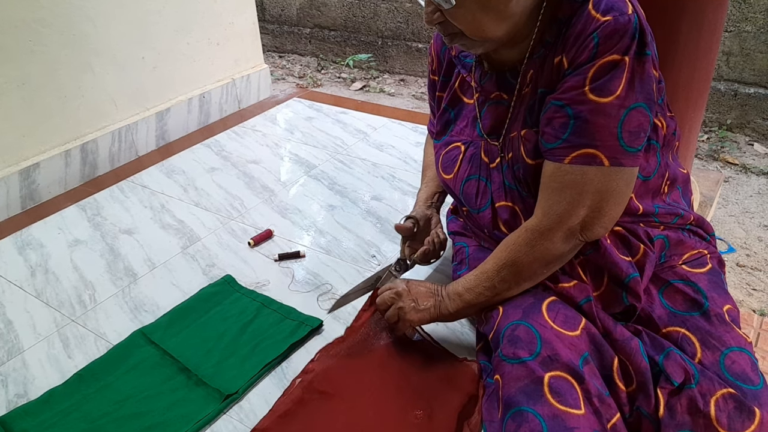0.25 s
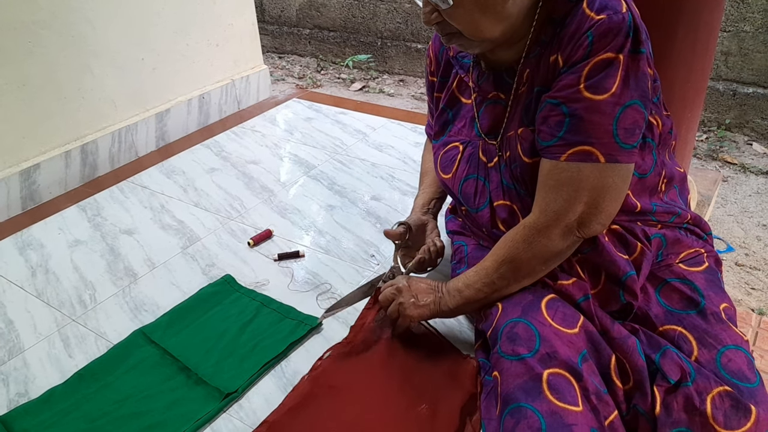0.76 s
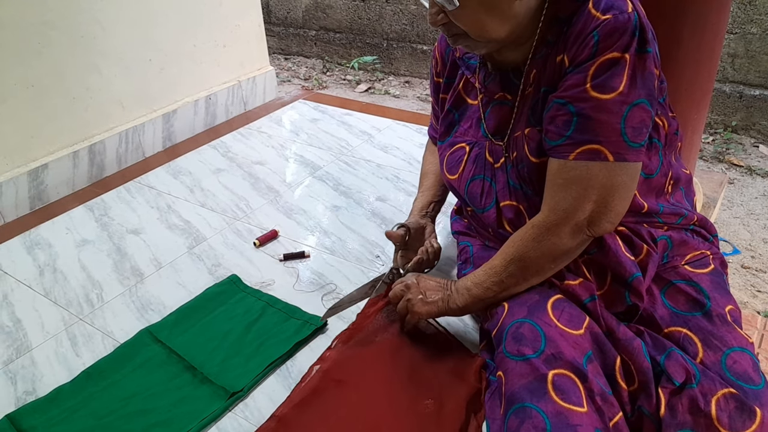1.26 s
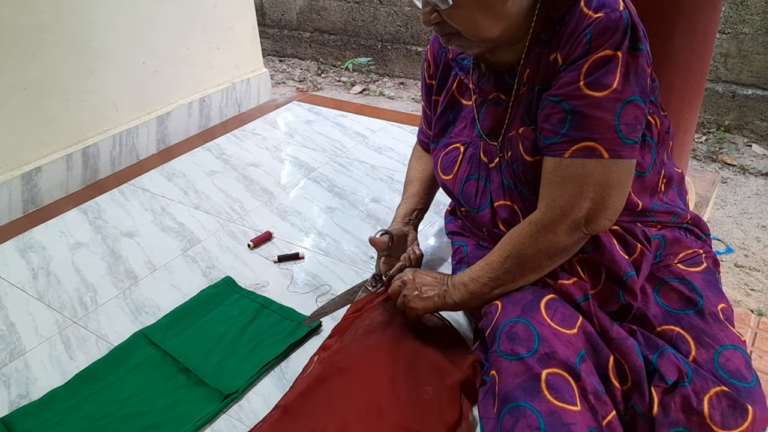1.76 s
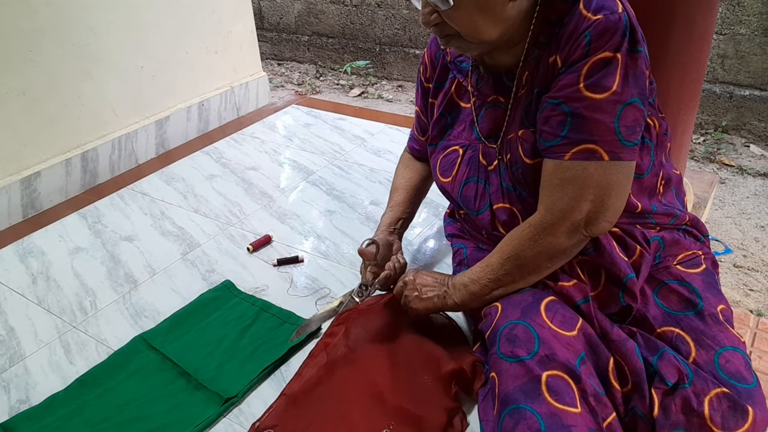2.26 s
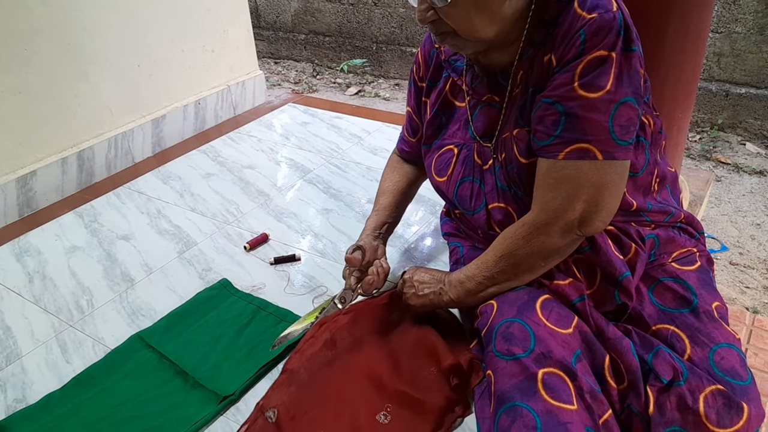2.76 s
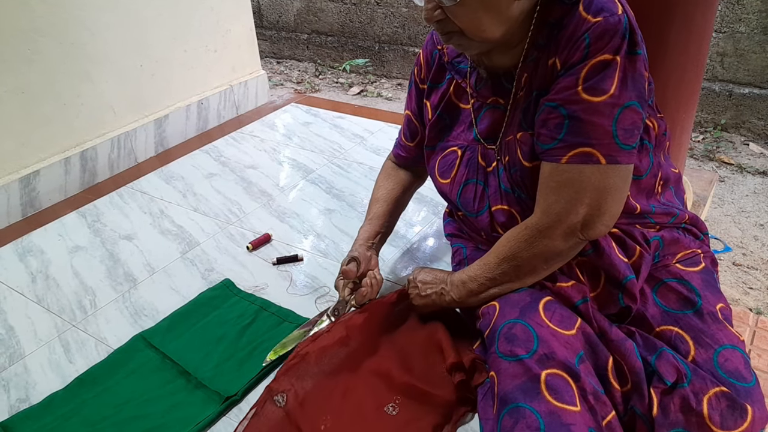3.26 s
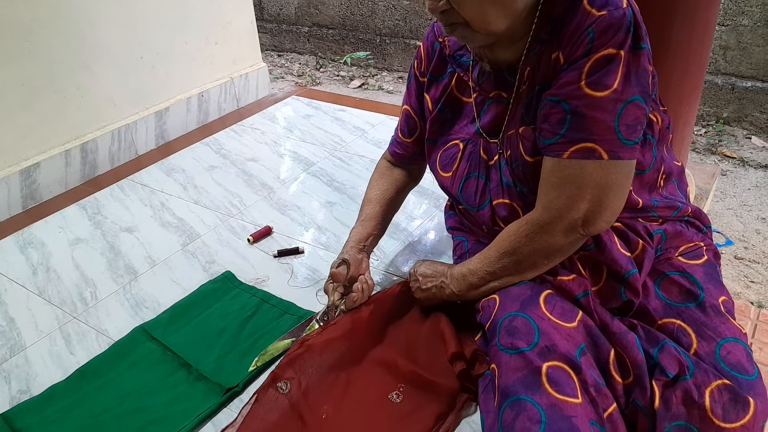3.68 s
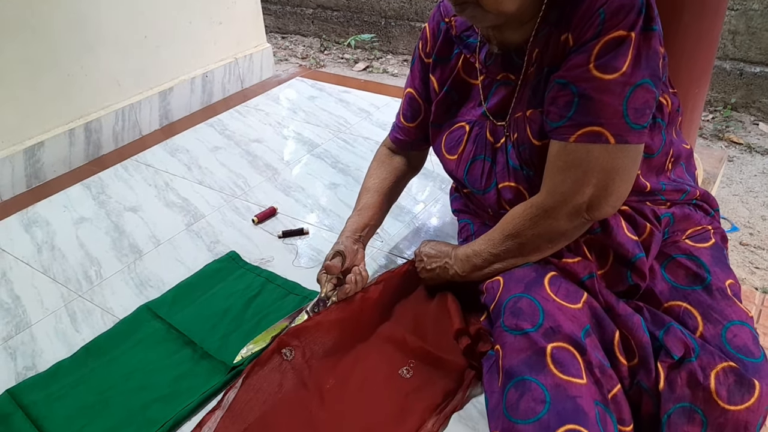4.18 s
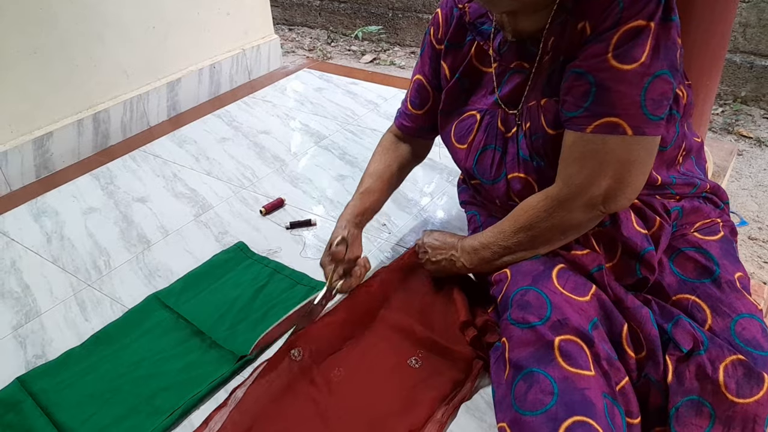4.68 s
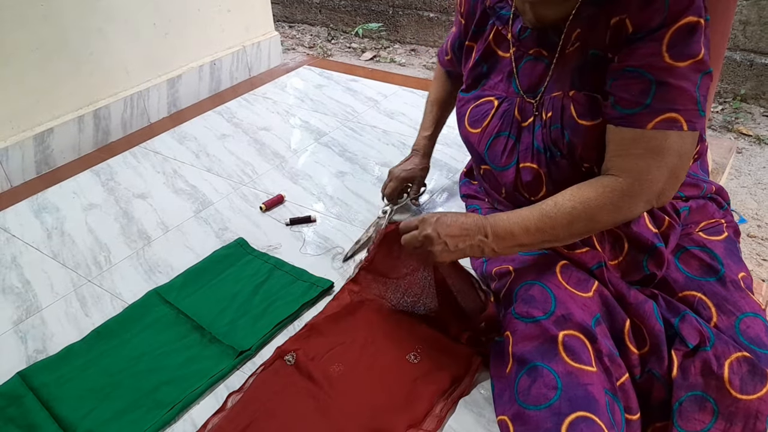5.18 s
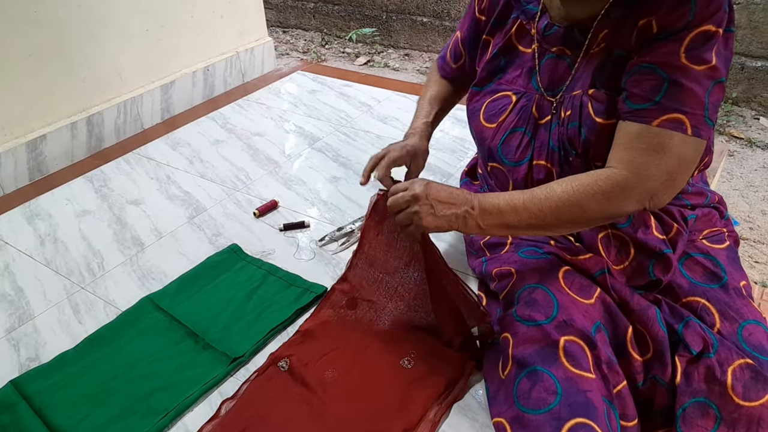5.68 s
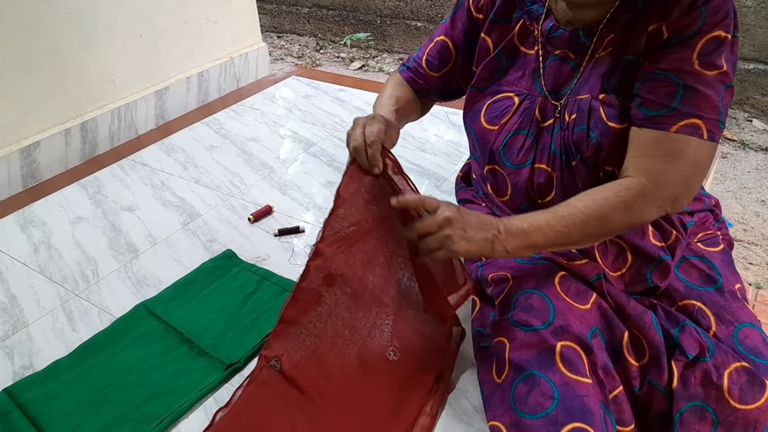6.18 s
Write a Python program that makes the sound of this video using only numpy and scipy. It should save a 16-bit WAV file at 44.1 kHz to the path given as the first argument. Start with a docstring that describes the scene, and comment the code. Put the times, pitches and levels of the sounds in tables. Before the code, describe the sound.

On an open tiled porch, the tail of a rooster's crow sags into a rasp within the first second. Close scissors then snip slowly through thin cloth, crunchy at first, thinner and quieter later. Near the end the steel scissors clatter on the stone floor, bounce and slide, and cloth rustles faintly. Far rooster calls and tiny chirps sit behind. Close stereo pickup, scissors slightly right.

```python
"""A yard beside an open tiled porch, heard by two spaced microphones with the scissors to the right.
Close by, steel scissors snip through thin cloth (grains of noise and ringing blades), then are dropped
on the stone floor, bounce and slide (contact noise ringing the steel's modes).
A rooster ends its crow (trembling partials and rasp); another rooster and small birds call far off
(narrow bands of noise). Low outdoor rumble and a faint hiss (shaped noise) lie under everything."""
import sys
import numpy as np
from scipy import signal
from scipy.fft import rfft, irfft
from scipy.io import wavfile

SR = 44100
rng = np.random.default_rng(int(sys.argv[2]) if len(sys.argv) > 2 else 0)


def gain_from_decibels(decibels):
    """Convert decibel values to linear amplitude factors."""
    exponent = np.asarray(decibels, float) / 20
    return 10 ** exponent


def wav_record(signal):
    """Record a signal, one row per channel, as 16-bit PCM in the file named by sys.argv[1]."""
    frames = np.transpose(np.atleast_2d(signal))
    bounded = np.clip(frames, -1, 1)
    # unit amplitude maps onto the largest positive 16-bit level
    quanta = np.round(bounded * 32767).astype(np.int16)
    wavfile.write(sys.argv[1], SR, quanta)


N = 284004   # length [samples]


def rms_one(x):
    """Scale to rms 1."""
    return x / np.sqrt(np.mean(x ** 2) + 1e-20)


def in_time(rows):
    """Columns of a curve, sample by sample, and a gate that fades in 8 ms outside its span."""
    s, *columns = np.transpose(rows)
    t = np.arange(N) / SR
    gate = np.interp(t, [s[0] - .008, s[0], s[-1], s[-1] + .008], [0, 1, 1, 0])
    return [np.interp(t, s, c) for c in columns] + [gate]


def drift(rate_hz):
    """Slow chance of spread 1: white noise through two equal one-pole lowpasses."""
    r = np.exp(-2 * np.pi * rate_hz / SR)
    settled = signal.lfilter([1], [1, -2 * r, r * r], rng.standard_normal(N + SR))[SR:]
    return rms_one(settled)


def colour(x, spectrum):
    """Shape by a spectrum in dB per Hz with the causal (minimum-phase) filter of that shape."""
    hz, level_db = np.transpose(spectrum)
    grid = np.maximum(np.arange(2049) * SR / 4096, 1)
    cepstrum = irfft(np.interp(np.log(grid), np.log(hz), level_db) * np.log(10) / 20)
    cepstrum[1:2048] *= 2   # folding the cepstrum forward makes the filter causal
    kernel = irfft(np.exp(rfft(cepstrum[:2049], 4096)))
    kernel = kernel.reshape((1,) * (x.ndim - 1) + (-1,))
    kernel = kernel / np.sqrt(np.sum(kernel ** 2))   # white noise keeps its level
    return signal.fftconvolve(x, kernel, axes=-1)[..., :N]


def resonance(x, hz, width_hz):
    """Two-pole resonance with gain 1 on top."""
    r = np.exp(-np.pi * width_hz / SR)
    poles = [1, -2 * r * np.cos(2 * np.pi * hz / SR), r * r]
    return signal.lfilter([(1 - r * r) / 2, 0, (r * r - 1) / 2], poles, x + 1e-18)


def narrow_noise(hz, width_hz):
    """Band of noise whose centre follows hz, from two drifts on carriers a quarter turn apart; rms 1."""
    turn = 2 * np.pi * np.cumsum(hz) / SR
    return drift(width_hz) * np.cos(turn) + drift(width_hz) * np.sin(turn)


def grains(per_s, spread_db):
    """Dense random clicks of uneven size; rms 1."""
    sizes = gain_from_decibels(spread_db * np.minimum(rng.exponential(1, N), 5)) * rng.choice([-1, 1], N)
    return rms_one(sizes * (rng.random(N) < per_s / SR))


def bursts(rows, rise_s, lengths_s, extra_db):
    """Envelope of sudden bursts that die away exponentially."""
    out, t = np.zeros(N), np.arange(SR // 5) / SR
    for row, length_s, db in zip(rows, lengths_s, extra_db + np.zeros(len(rows))):
        at = round(row[0] * SR)
        shape = (1 - np.exp(-t / rise_s)) * np.exp(-t / length_s)
        out[at:at + len(t)] += gain_from_decibels(row[1] + db) * shape
    return out


def swell(start, end):
    """Half a sine from start to end [s]."""
    return np.sin(np.pi * np.clip((np.arange(N) / SR - start) / (end - start), 0, 1))


LEFT_LAG_S = .00014   # the common part reaches the left microphone this much later


def both_sides(make, shared):
    """A spread-out source: each side hears a common part, right side first, and a part of its own."""
    common = make()
    common = np.array([np.roll(common, round(LEFT_LAG_S * SR)), common])
    own = np.array([make(), make()])
    return np.sqrt(shared) * common + np.sqrt(1 - shared) * own


# the blades close through the cloth:
# (start [s], length [s], level at the start [dB], gain until the end [dB])
CLOSINGS = [(0.709, 0.059, -55.5, 5), (0.978, .13, -62, 6.5), (1.171, 0.29, -66, 10),
            (1.861, 0.11, -62, -0.5), (2.292, 0.099, -62.5, 6.5), (2.702, 0.2, -60, -9),
            (3.187, 0.19, -63.5, 0), (3.699, 0.11, -62.5, -4.5), (4.092, 0.097, -67.5, 6.5),
            (4.455, 0.12, -70.5, 1)]
# the blades open again and brush the cloth: (start [s], end [s], level at the crest [dB])
OPENINGS = [(1.628, 1.758, -68.5), (2.053, 2.18, -69.5), (2.503, 2.66, -68.5), (2.937, 3.088, -73),
            (3.417, 3.604, -75), (3.88, 4.055, -74.5), (4.322, 4.43, -76), (4.64, 4.84, -80.5)]
BITE_S, LET_GO_DB_PER_S = 0.016, 356   # rise and fall of a closing


def strokes():
    """Effort of the blades: closings bite at once, change in level and let go; openings swell softly."""
    t = np.arange(N) / SR
    out = sum(gain_from_decibels(db) * swell(start, end) for start, end, db in OPENINGS)
    for start, length, db, gain_db in CLOSINGS:
        level_db = db + gain_db * np.clip((t - start) / length, 0, 1)
        level_db -= LET_GO_DB_PER_S * np.clip(t - start - length, 0, 1)
        out = out + np.clip((t - start) / BITE_S, 0, 1) * gain_from_decibels(level_db)
    return out


# threads part in a jerk:
# (time [s], level before rise and decay [dB], blade ring relative to that [dB])
SLIPS = [(0.721, -53, -26), (1.18, -69, -10), (1.387, -57, -29), (1.443, -69, -11), (1.482, -44, -8),
         (1.672, -64, -8), (1.87, -61, -14), (1.911, -45.5, 6), (1.95, -40.5, -11), (2.277, -67, 7),
         (2.302, -55.5, 8), (2.336, -49, 4), (2.385, -51.5, 6), (2.752, -45, 1), (2.79, -56, 3),
         (2.858, -47.5, -6), (3.212, -51.5, -7), (3.262, -52, 1), (3.291, -50, -3.5), (3.356, -52, 1.5),
         (3.714, -54, -9), (3.755, -53.5, 8), (3.791, -58, 8), (4.098, -66, -2), (4.115, -58, 3),
         (4.183, -61, -4), (4.494, -62.5, 11), (4.518, -63.5, 11), (4.556, -58, 3)]
SLIP_RISE_S, SLIP_S = .008, 0.0074   # time constants of a jerk's rise and decay
# colour of parting threads: (frequency [Hz], level [dB per Hz])
CLOTH = [(800, -22), (2000, -6), (3000, -10), (3600, -6), (5500, -2.5), (9400, -3), (14000, -1.5),
         (16000, -6)]
# the fold of cloth thins as the cut goes on:
# (time [s], crunch relative to force [dB], low rustle relative to stroke [dB])
FOLD = [(.72, -4, -1), (1.0, -9, -18), (1.35, -8.5, -8), (2.3, -9.5, -15), (3.2, -25, -15),
        (4.6, -62, -17.5)]
# cloth shifts under the hands throughout and is lifted at the end: (time [s], level [dB])
RUSTLE = [(.1, -71), (.45, -72), (.62, -76), (.71, -61.5), (.85, -78.5), (2.0, -82.5), (3.6, -83.5),
          (5.15, -79.5), (5.6, -73), (5.75, -88), (5.86, -75.5), (6.074, -79), (6.1, -72), (6.44, -79.5)]
# resonances of the blades: (frequency [Hz], width [Hz], middle of the wavering level [dB])
BLADES = [(5700, 300, -9), (6700, 250, -8), (7750, 350, -6), (10900, 200, 0), (11900, 250, -6),
          (14300, 500, -1)]


def cutting():
    """Close at hand, threads part as dense grains; each jerk also sets the blades singing."""
    crunch_db, low_db, _ = in_time(FOLD)
    rustle_db, gate = in_time(RUSTLE)
    lengths_s, ring_db = np.full(len(SLIPS), SLIP_S), np.transpose(SLIPS)[2]
    stroke = strokes() * gain_from_decibels(2.0 * drift(30))
    force = stroke + bursts(SLIPS, SLIP_RISE_S, lengths_s, 0)
    parting = both_sides(lambda: grains(9000, 2.96), 0.21)
    threads = colour(parting, CLOTH) * (force + gate * gain_from_decibels(rustle_db))
    crunch = rms_one(resonance(resonance(parting, 3750, 2400), 4730, 2400)) * gain_from_decibels(crunch_db)
    low_rustle = rms_one(resonance(parting[1], 350, 1300)) * gain_from_decibels(low_db)
    rub = both_sides(lambda: rng.standard_normal(N), 0.033)
    rings = 0
    for hz, width_hz, level_db in BLADES:
        rings = rings + gain_from_decibels(level_db + 4.0 * drift(10)) * rms_one(resonance(rub, hz, width_hz))
    ring_force = bursts(SLIPS, SLIP_RISE_S, lengths_s, ring_db) + gain_from_decibels(-15.0) * force
    return threads + force * crunch + stroke * low_rustle + rings * ring_force


# scissors meet the floor: (time [s], level before rise, decay and trims [dB],
# rattle decay time [s], best excited pitch [Hz], bright crack relative to the level [dB])
DROPS = [(5.183, -17, 0.01, 6546, 4), (5.391, -30.5, 0.0098, 5000, -17), (5.487, -20.5, 0.011, 8866, -15),
         (5.653, -16.5, 0.012, 5512, -13)]
LANDING_S = .0025   # time constant with which a drop builds up
# scraping over stone: (time [s], level [dB], low grind relative to that [dB])
SLIDE = [(5.49, -41.5, -16.5), (5.52, -36.5, -13), (5.59, -36.5, -18.5), (5.62, -43, -16.5),
         (5.645, -63, 11.5)]
# contact colour of the floor: (frequency [Hz], level [dB per Hz])
STONE = [(180, -36.5), (300, -7), (455, -18.5), (930, -20), (2840, -6), (3290, 2.5), (5520, 1.5),
         (10600, -2.5), (14000, -4.5), (16000, -19)]
# modes of the loose scissors: (frequency [Hz], width, held to 45 or more [Hz], level [dB])
SCISSORS = [(1610, 28, -14), (1984, 60, -11), (2260, 26, -23), (3470, 40, -36), (4130, 27, -17),
            (4520, 43, -25), (5000, 27, -12.5), (5512, 47, -8), (6000, 60, -28), (6546, 50, -3.5),
            (8020, 120, -5.5), (8866, 150, -2.5), (10040, 110, -14), (11600, 130, -17), (12810, 130, -12.5),
            (13800, 130, -4), (15550, 140, -14)]


def scissors_on_floor():
    """Each drop is a short rattle of contacts, the slide a steady one; both ring the steel's modes."""
    slide_db, grind_db, gate = in_time(SLIDE)
    lengths_s, best_hz, crack_db = np.transpose(DROPS)[2:]
    sliding = gate * gain_from_decibels(slide_db + 1.8 * drift(45))
    touch = both_sides(lambda: grains(8000, 2.9), 0.18)
    out = colour(touch * (bursts(DROPS, LANDING_S, lengths_s, -7) + sliding), STONE)
    crack = touch * bursts(DROPS, LANDING_S, .5 * lengths_s, crack_db)
    out += signal.sosfilt(signal.butter(2, 8000, "high", fs=SR, output="sos"), crack)
    for hz, width_hz, level_db in SCISSORS:
        width_hz = max(width_hz, 45)
        # where the steel lands decides which modes ring most
        octaves_off = np.abs(np.log2(hz / best_hz))
        favoured_db = 5.0 - 11.0 * np.minimum(octaves_off / 0.13, 1)
        blows = bursts(DROPS, LANDING_S, lengths_s, favoured_db - 12) + gain_from_decibels(-16.5) * sliding
        even = np.sqrt(SR / (np.pi * width_hz))   # makes up for the power a narrow mode lets through
        out += gain_from_decibels(level_db) * even * resonance(touch * blows, hz, width_hz)
    grind = rms_one(resonance(rng.standard_normal(N), 534, 240))
    return out + gate * gain_from_decibels(slide_db + grind_db) * grind


TIRE_DB_PER_S, SLACKEN_DB_PER_S = 4, 218   # effort sinks from the start, then drops once let go


def held_note(start, held, end, hz, sag, linger_db):
    """Pitch, effort and gate of one note: pitch sags and effort sinks to a lingering level."""
    t = np.arange(N) / SR
    effort_db = -TIRE_DB_PER_S * np.clip(t - start, 0, 1) - SLACKEN_DB_PER_S * np.clip(t - held, 0, 1)
    effort_db = np.maximum(effort_db, linger_db)
    # no fade in the first 20 ms: the crow is already under way
    gate = np.clip(np.minimum(t - start + .01, end - t) / .02, 0, 1) ** (t > .02)
    return hz - sag * np.clip(t - start, 0, 1), effort_db, gate * (t > start - .01)


# held notes of the crow: (start [s], held until [s], end [s], pitch at the start [Hz],
# sag [Hz per s], effort at which it lingers [dB])
NOTES = [(0, 0.029, 0.34, 705, 1, -14), (0.032, 0.264, 0.48, 732.2, 23, -11.5),
         (0.209, 0.559, 0.736, 964.6, 75, -10)]
# partials of each note, nearby walls push each one to a side:
# (multiple of the pitch, level at full effort [dB], left minus right [dB], left lead [rad])
PARTIALS = [
    [(1, -44, -14.5, 2.84), (2, -36.5, -10, 1.9), (3, -65, 13, .5), (4, -65, -3, 1.2), (6, -67, -3, 1.4)],
    [(1, -45.5, -1, 0.84), (2, -65, -30, -9.7), (3, -64.5, -3, 1), (4, -53, 2, 2), (6, -74.5, -11, -3.5),
     (8, -76, 9, -5.5)],
    [(1, -49, -4, -1.4), (2, -39.5, 1, -2.5), (3, -59.5, 3, -1.7), (5, -71.5, -6, 1.5),
     (6, -76, -11.5, 4.5), (9, -77, -4, 2.5)],
]
# hoarse rasp under the later notes: (time [s], lowest throat resonance [Hz], level [dB])
RASP = [(0.18, 640, -55), (0.214, 640.3, -51), (0.5, 592, -51), (0.76, 578, -48.5), (0.87, 579.7, -56),
        (0.9, 570, -98)]
# throat resonances: (multiple of the lowest, width [Hz], level relative to the rasp [dB])
RASP_THROAT = [(1, 46, -5.5), (1.25, 254, -7.5), (2.3, 154, -7), (3.15, 210, -14.5), (8.0, 320, -29),
               (9.7, 320, -33)]


def rooster():
    """Clear notes with slightly trembling pitch, and a breathy rasp in the throat resonances."""
    out, side = np.zeros((2, N)), np.array([[.5], [-.5]])
    for note, partials, tremble in zip(NOTES, PARTIALS, (.0005, .0012, .004)):
        pitch, effort_db, gate = held_note(*note)
        turn = 2 * np.pi * np.cumsum(pitch * (1 + tremble * drift(28.7))) / SR
        for multiple, level_db, pan_db, lead in partials:
            # each side flutters by itself; less effort dulls the upper partials first
            flutter_db = 800 * tremble * np.sqrt(multiple) * np.tanh([drift(35), drift(35)])
            partial_db = effort_db * (1 + 0.33 * multiple) + level_db + flutter_db + pan_db * side
            out += np.sqrt(2) * gate * gain_from_decibels(partial_db) * np.sin(multiple * turn + lead * side)
    lowest, rasp_db, gate = in_time(RASP)
    for multiple, width_hz, level_db in RASP_THROAT:
        shared, own = [narrow_noise(multiple * lowest, width_hz) for k in range(2)]
        breath = shared + 0.56 * multiple * own * side   # sides differ more higher up
        out += gate * gain_from_decibels(rasp_db + level_db - 1.5 * side) * breath
    return out


# far rooster, each note swells and fades: (start [s], end [s], pitch [Hz], level at the crest [dB])
FAR_CROWS = [(2.333, 2.64, 555.6, -68), (2.607, 2.8, 535, -76.5), (2.743, 3.096, 603, -66.5),
             (5.078, 5.43, 476.3, -69.5), (6.01, 6.33, 501, -74)]
# small birds: (start [s], end [s], pitch [Hz], level at the crest [dB])
FAR_CHIRPS = [(1.674, 1.84, 2045, -81), (2.665, 2.874, 2160, -73), (3.406, 3.667, 3500, -87),
              (4.432, 4.645, 1894, -85)]


def far_birds():
    """Distance smears each note into a wavering band; the rooster keeps a weak second partial."""
    out = np.zeros(N)
    for start, end, hz, level_db in FAR_CROWS:
        pitch = np.full(N, hz)
        note = narrow_noise(pitch, 60) + gain_from_decibels(-18) * narrow_noise(2 * pitch, 70)
        out += gain_from_decibels(level_db) * swell(start, end) * note
    for start, end, hz, level_db in FAR_CHIRPS:
        out += gain_from_decibels(level_db) * swell(start, end) * narrow_noise(np.full(N, hz), .008 * hz)
    return out


# outdoor background: (time [s], rumble before slow wavering [dB], hiss before a 9.5 dB lift [dB])
BACKGROUND = [(0, -64.5, -73), (.6, -66, -75.5), (1.13, -66.5, -86.5), (1.63, -70.5, -85),
              (2.4, -68.5, -84), (3.62, -67.5, -86.5), (3.78, -71, -89), (5.13, -70, -87),
              (5.6, -63.5, -75.5), (5.9, -71.5, -87), (6.44, -74, -87)]
# colour of the rumble: (frequency [Hz], level [dB per Hz])
RUMBLE = [(12, -39), (24, -14.5), (33, -1), (59, 6.5), (181, -4.5), (435, -11), (483, -13.5), (552, -19),
          (700, -33), (910, -24), (1540, -120)]
# colour of the hiss: (frequency [Hz], level [dB per Hz])
HISS = [(290, -13.5), (500, 5.5), (988, -1), (1900, 2), (3490, -6.5), (4940, -5.5), (10500, -12),
        (15100, -27), (16000, -31)]
# left-right likeness of the background: (frequency [Hz], correlation [0 to 1])
LIKENESS = [(60, 0.75), (250, 0.75), (700, 0.058), (1400, 0)]


def background():
    """Rumble and hiss as shaped noise, largely shared in the bass and unrelated in the treble."""
    rumble_db, hiss_db, _ = in_time(BACKGROUND)
    gust_db = 1.5 * drift(4)

    def layer():
        rumble = gain_from_decibels(rumble_db + gust_db) * colour(rng.standard_normal(N), RUMBLE)
        return rumble + gain_from_decibels(hiss_db + 9.5) * colour(rng.standard_normal(N), HISS)

    hz, alike = np.transpose(LIKENESS)
    bins_hz = np.arange(N // 2 + 1) * SR / N
    share = np.clip(np.interp(np.log(bins_hz + 1), np.log(hz + 1), alike), 0, 1)
    mid = irfft(rfft(layer()) * np.sqrt(1 + share), N)
    side = irfft(rfft(layer()) * np.sqrt(1 - share), N)
    return np.array([mid + side, mid - side])


def echoes(x, t60, wet_db, gap_s):
    """Dense echoes after a gap, dying 60 dB in t60 seconds, unlike on each side."""
    t = np.arange(int(.6 * SR)) / SR
    tail = rng.standard_normal((2, len(t))) * gain_from_decibels(-60 * t / t60) * (t > gap_s)
    tail *= gain_from_decibels(wet_db) / np.sqrt(np.sum(tail ** 2, axis=1, keepdims=True))
    return signal.fftconvolve(tail, x[None], axes=1)[:, :N]


PORCH_T60_S, PORCH_DB, CUT_PORCH_DB = 0.24, -1, -9   # echo levels: dropped scissors, cutting


def space(x, wet_db):
    """On the porch: the direct sound and dense echoes off floor and walls."""
    return x + echoes(x[1], PORCH_T60_S, wet_db, 0.0044)


YARD_T60_S, YARD_DB = 0.53, -7


def scene():
    """Scissors sound through the porch, the birds through the yard, over the outdoor background."""
    scissors = space(cutting(), CUT_PORCH_DB) + space(scissors_on_floor(), PORCH_DB)
    birds = rooster() + far_birds()
    yard = echoes(birds[1], YARD_T60_S, YARD_DB, 0.017)
    return scissors + birds + yard + background()


def top_cut(x):
    """Nothing passes above the cut-off."""
    return signal.sosfilt(signal.butter(12, 16640, fs=SR, output="sos"), x)


# left microphone against right: (frequency [Hz], level [dB])
LEFT_MIC = [(60, 5), (240, -1.5), (950, -2.5), (3770, -0.5), (15000, -2.5)]


def record(dry):
    """The two microphones differ in colour, half of the difference applied to each."""
    hz, left_db = np.transpose(LEFT_MIC)
    bins_hz = np.arange(N // 2 + 1) * SR / N
    tilt_db = np.interp(np.log(bins_hz + 1), np.log(hz), left_db)
    heard = irfft(rfft(dry) * gain_from_decibels(tilt_db * [[.5], [-.5]]), N)
    return top_cut(heard)


dry = scene()
out = record(dry)
wav_record(out)
```